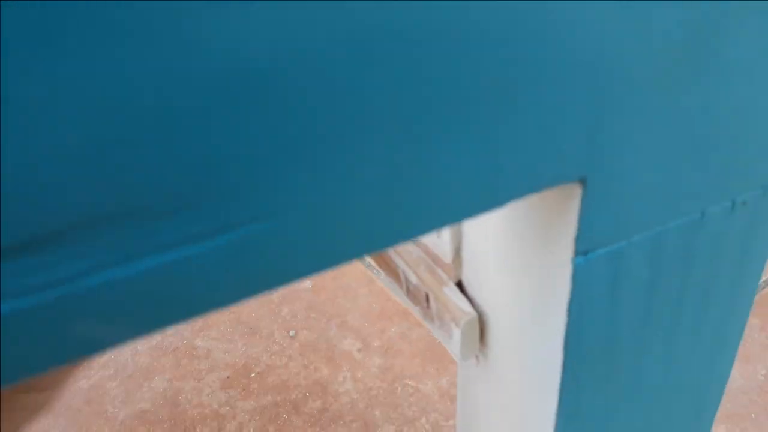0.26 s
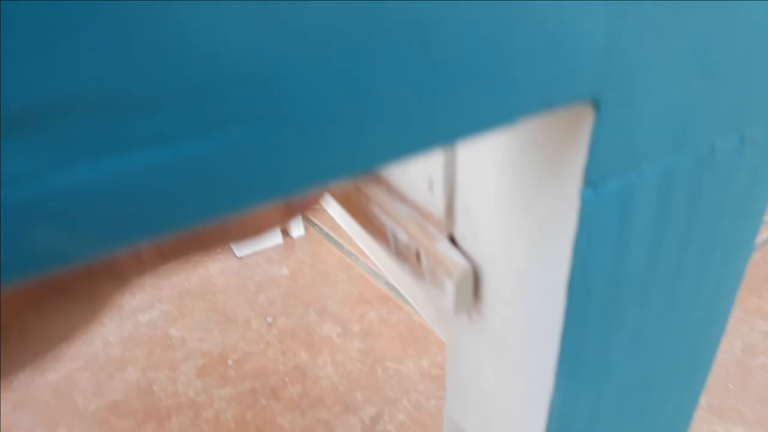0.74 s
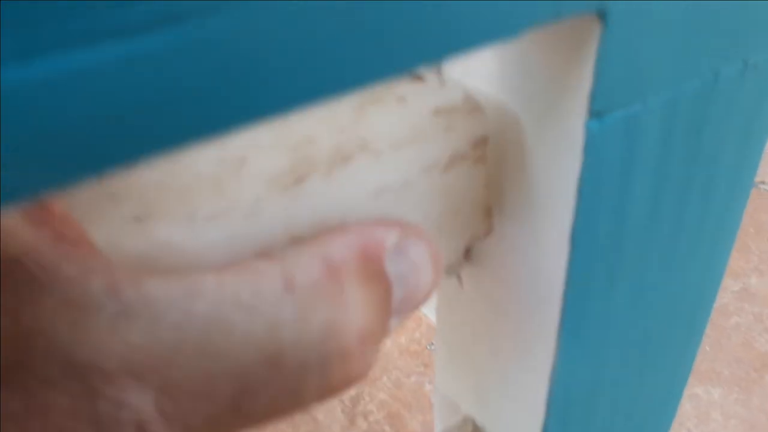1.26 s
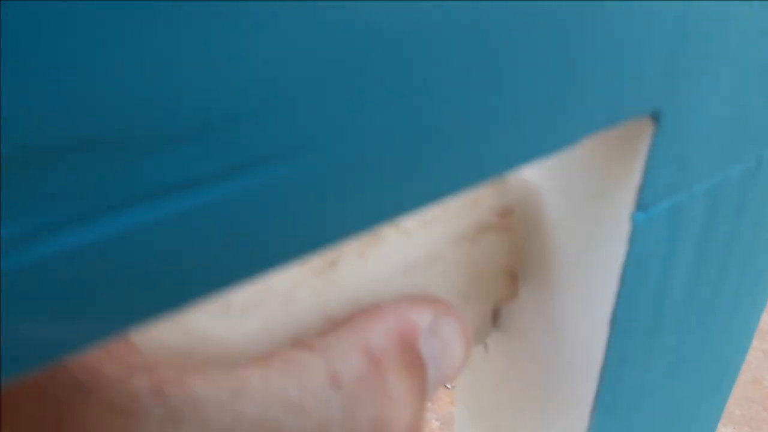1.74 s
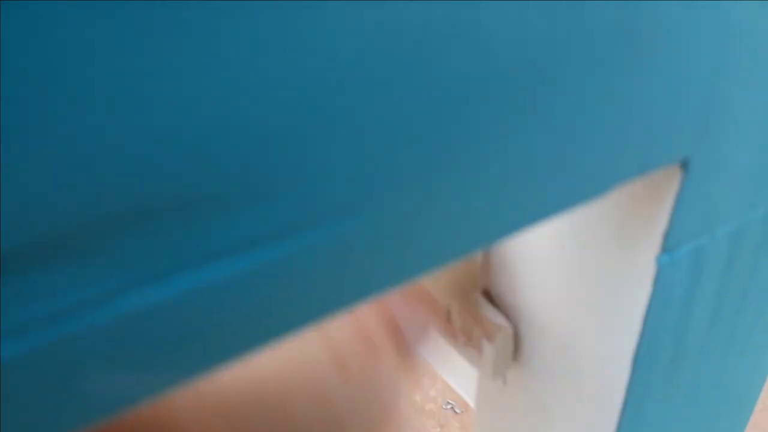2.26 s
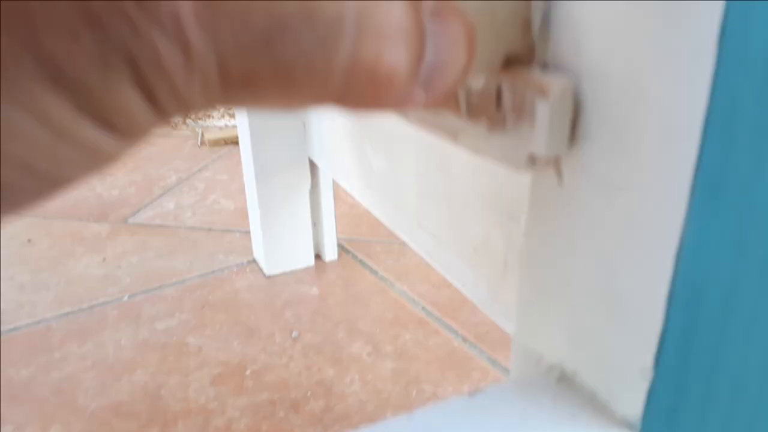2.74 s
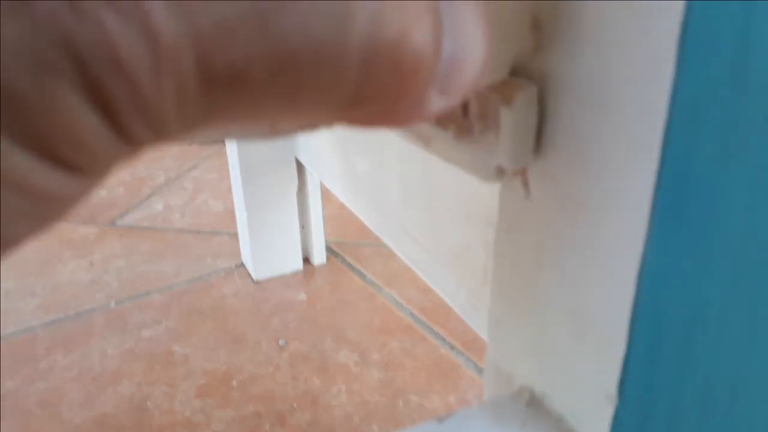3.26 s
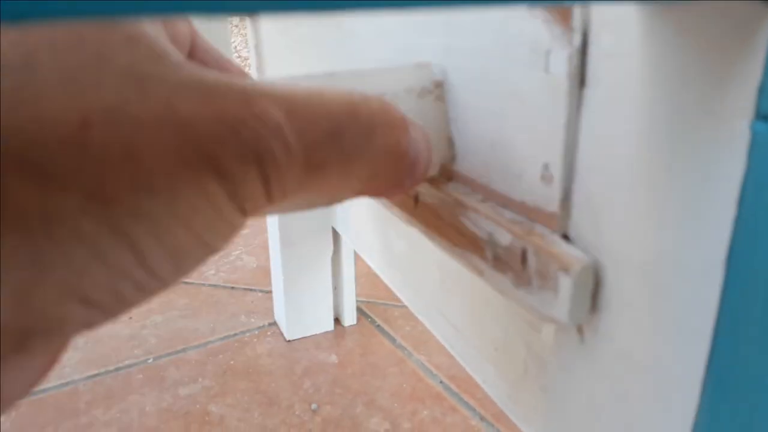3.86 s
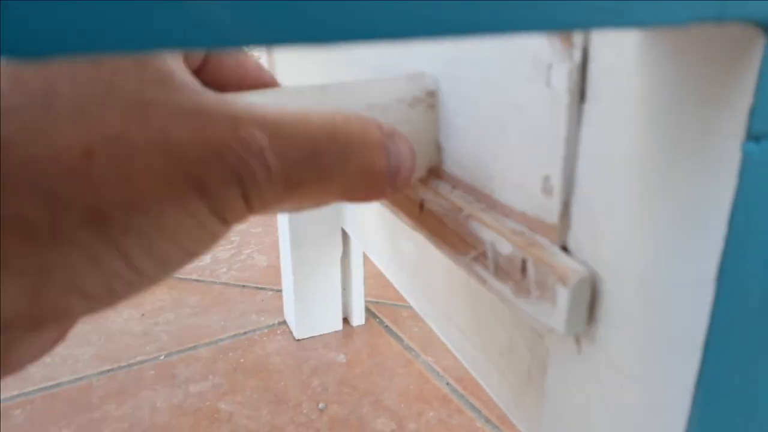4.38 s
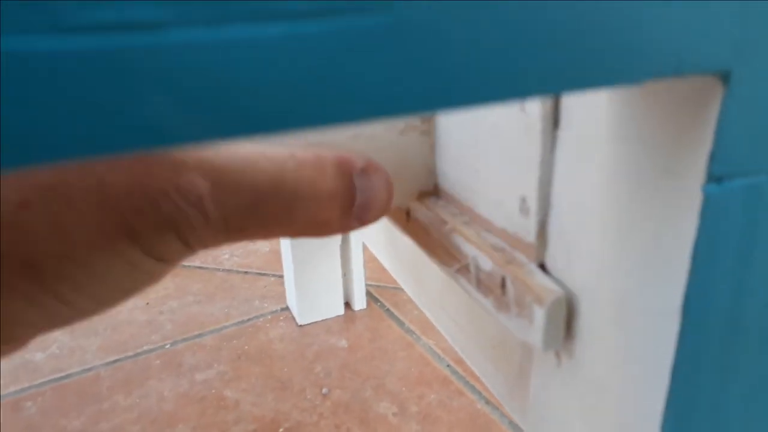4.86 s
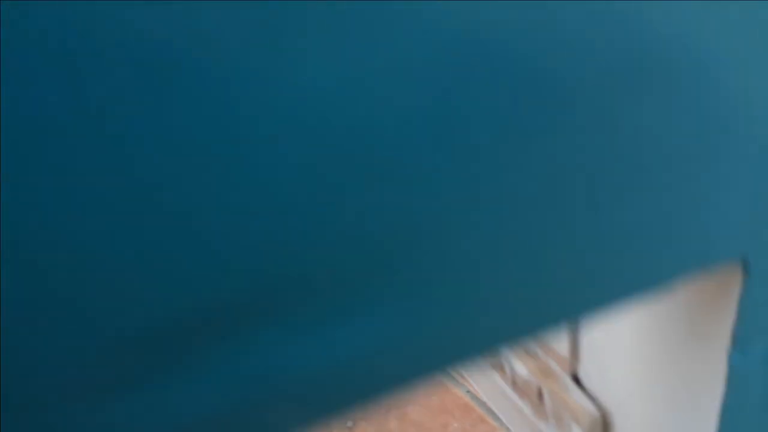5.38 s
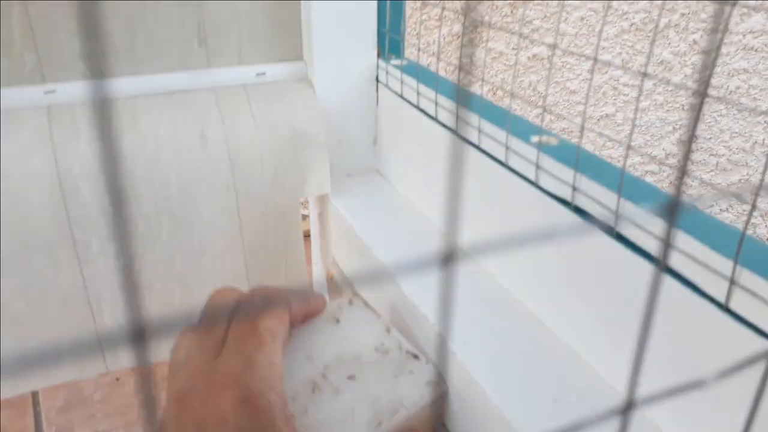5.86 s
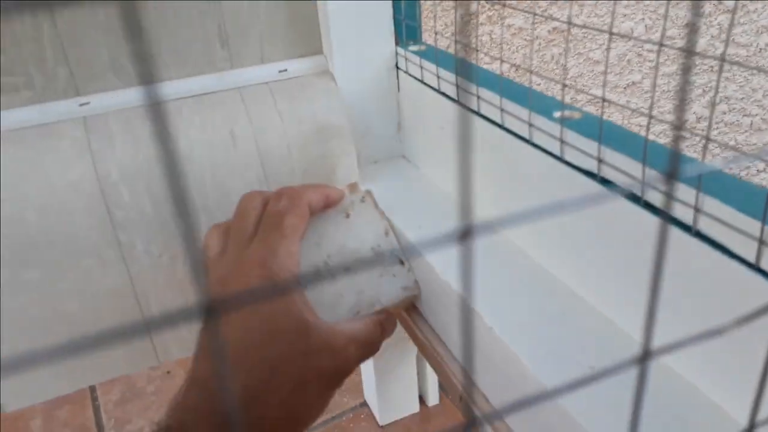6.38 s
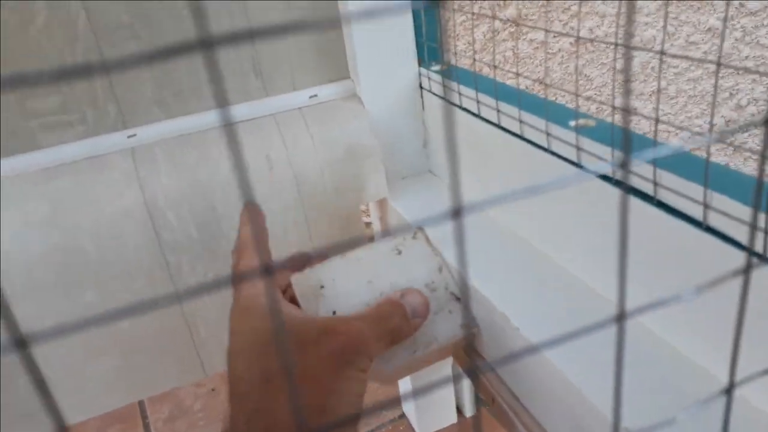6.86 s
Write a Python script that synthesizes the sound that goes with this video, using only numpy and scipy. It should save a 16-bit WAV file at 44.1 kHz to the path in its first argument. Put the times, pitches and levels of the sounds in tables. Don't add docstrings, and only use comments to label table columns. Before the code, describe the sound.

Close to a handheld microphone, a block bangs hard on a small wooden hutch, with a boomy thud and two further knocks. Soft, quick rubbing strokes follow, woody and grainy with faint squeaks. After a brief lull the rubbing resumes with small bumps, then a sharp late knock and heavier strokes. Air buffets the microphone as it moves outside, where the strokes turn duller and stop. A small latch clacks amid thin bird peeps.

```python
import sys
import numpy as np
from scipy import signal
from scipy.fft import rfft, irfft, next_fast_len
from scipy.io import wavfile
from scipy.ndimage import uniform_filter1d

SR = 44100
rng = np.random.default_rng(int(sys.argv[2]) if len(sys.argv) > 2 else 0)


def ratio_of_db(decibels):
    return 10 ** (np.asarray(decibels, float) / 20)


def unload_audio(sound):
    columns = np.transpose(np.atleast_2d(sound))
    steps = np.round(np.clip(columns, -1, 1) * 32767)
    wavfile.write(sys.argv[1], SR, steps.astype(np.int16))


N = 314080

REST_DB = -82
STRUCK_DB = -23
SWEEP_DROP_DB, SWEEP_ROUND = 17, 1.6


def evened(x):
    return x / np.sqrt(np.mean(x ** 2) + 1e-20)


def peaked(x):
    return x / abs(x).max()


def column(rows, k, at):
    table = np.array(rows)
    return np.interp(at, table[:, 0], table[:, k])


def add(mix, s, sound):
    part = mix[round(s * SR):][:len(sound)]
    part += sound[:len(part)]


def coloured(x, points):
    hz, db = np.transpose(points)
    size = next_fast_len(x.shape[-1])
    f = np.fft.rfftfreq(size, 1 / SR)
    gain = ratio_of_db(np.interp(np.log(f + 1), np.log(hz), db))
    return irfft(rfft(x, size) * gain, size)[..., :x.shape[-1]]


def above(x, hz):
    return signal.sosfilt(signal.butter(3, hz, "high", fs=SR, output="sos"), x)


def softened(x, hz):
    return signal.sosfilt(signal.butter(2, hz, fs=SR, output="sos"), x)


def ring(x, hz, t60):
    r = 1000 ** (-1 / (t60 * SR))
    w = 2 * np.pi * hz / SR
    return signal.lfilter([.5, 0, -.5], [1, -2 * r * np.cos(w), r * r], x)


def tail(t60, seconds):
    t = np.arange(round(seconds * SR)) / SR
    taps = rng.standard_normal((2, len(t))) * ratio_of_db(-60 * t / t60) * np.minimum(t / 0.0038, 1)
    return taps / np.linalg.norm(taps, axis=1, keepdims=True)


def wander(per_s):
    knots = rng.standard_normal(int(40 * N / SR))
    return np.interp(np.arange(N) * per_s / SR, np.arange(len(knots)), knots)


def swells(rows, drop_db, shape, floor_db):
    t = np.arange(0, N / SR + .004, .002)
    top, rise, fall, db = np.array(rows, float).T[:, :, None]
    before = (top - t) / np.maximum(rise, .005)
    after = (t - top) / np.maximum(fall, .005)
    away = np.where(t < top, before, after)
    power = (ratio_of_db(db - drop_db * away ** shape) ** 2).sum(0) + ratio_of_db(floor_db) ** 2
    return np.interp(np.arange(N) / SR, t, 10 * np.log10(power))


def slips(per_s, spread_db):
    size = ratio_of_db(spread_db * np.minimum(rng.exponential(1, N), 4)) * rng.choice([-1., 1.], N)
    return evened(size * (rng.random(N) < per_s / SR))


# (frequency [Hz], level [dB], t60 [s])
FRAME_MODES = [(292, -14, 0.07), (350, -3.5, 0.073), (387.6, -8, 0.051), (438.8, -1, 0.074),
               (481.3, 3, 0.073), (543.3, -6.5, 0.13), (596, -2.5, 0.056)]
UPPER_MODES = [(713, 1, 0.062), (739, 0, 0.11), (809, 4.5, 0.033), (920, 2.5, 0.036), (1063, -1, 0.11),
               (1126, -12, 0.1), (1257, 3.5, 0.06), (1530, -26, .04), (1790, -34, .03)]
# (time [s], peak [dB], struck part of the frame [Hz], upper modes re peak [dB])
KNOCKS = [(0.0615, 2, 475, -6), (0.3675, -10, 320, -13.5), (0.687, -1.5, 473, 9), (1.766, -37.5, 376, -17),
          (2.051, -30, 490, -1), (3.087, -17, 486, -6), (3.349, -21.5, 520, -13), (3.495, -27, 590, 8),
          (3.599, -31.5, 550, 18), (3.74, -25, 487, 4), (3.843, -29, 484, 1), (4.24, -24.5, 605, -3),
          (6.185, -33.5, 350, -14), (4.718, -17, 596, -5), (4.848, -3.5, 560, 1), (4.995, -21, 560, 1),
          (5.834, -41, 400, -20)]
JOLTS = [(0.0634, -6, 344.6, -24), (0.072, -5, 430, 2), (0.081, -9, 560, -13), (0.094, -15.5, 304, -6),
         (0.108, -18, 295, -10), (0.6845, -13.5, 498, -12), (0.706, -17, 480, 5), (0.728, -20.5, 427, -1),
         (3.118, -30, 480, 2), (3.385, -31.5, 497, -11), (3.507, -29, 605, 5), (3.52, -28, 390, -4),
         (3.86, -40, 450, -3), (4.252, -29.5, 543, -3), (5.85, -26, 397, -20), (3.754, -29, 474, -15),
         (3.948, -36, 480, -1), (3.967, -31, 483, 19), (3.992, -28, 520, 2), (4.27, -31, 590, -12),
         (4.333, -34, 440, -5), (4.4, -30.5, 466, -18), (4.845, -14, 600, 6), (4.854, -7, 535, -7),
         (4.858, -10, 560, -17), (4.87, -26, 350, -11), (4.878, -25, 590, -18), (4.888, -26, 584, -16),
         (5.02, -32, 543, -4), (5.147, -40, 480, -15), (5.189, -24.5, 478, -13), (5.346, -35, 483, -6),
         (5.536, -24.5, 460, -22), (5.688, -33, 476, -4), (5.83, -35, 450, -4), (5.987, -29.5, 460, -9),
         (6.023, -49, 450, 2), (6.06, -29.5, 440.6, -5), (6.173, -38, 350, -22), (6.215, -30.5, 380, -21),
         (6.235, -38, 435, -19)]


def knocks():
    out, t = np.zeros(N), np.arange(8000) / SR
    for s, peak_db, struck_hz, upper_db in KNOCKS + JOLTS:
        blow_ms = 4.8 if peak_db > STRUCK_DB else 7.9
        noise = np.pad(rng.standard_normal(2000), (0, len(t) - 2000))
        rough = noise * t * np.exp(-2000 * t / blow_ms)
        snap = np.exp(-((t - .0025) / .0004) ** 2)
        top_hz = np.clip(2300 * ratio_of_db(0.25 * peak_db), 400, 9000)
        push = softened(peaked(rough) + 0.33 * snap, top_hz)
        near = np.zeros(len(t))
        for hz, db, t60 in FRAME_MODES:
            loaded_hz = hz * (struck_hz / 480) ** .12
            focus_db = 45 * np.log2(hz / struck_hz) ** 2
            near += peaked(ring(push, loaded_hz, t60)) * ratio_of_db(db - focus_db)
        high = sum(ring(push, hz, 0.5 * t60) * ratio_of_db(0.76 * db) for hz, db, t60 in UPPER_MODES)
        one_rail = ratio_of_db(-22 - 60 * abs(np.log2(struck_hz / 555))) * peaked(ring(push, 550, .6))
        blow = peaked(peaked(near) + ratio_of_db(upper_db) * peaked(high) + one_rail)
        add(out, s - .001, ratio_of_db(peak_db - 2.5) * blow)
    room = signal.fftconvolve(out, tail(0.12, seconds=.4)[0])[:N]
    return softened(softened(above(out + ratio_of_db(-11) * room, 220), 1500), 1900)


# (time [s], time to ease by 20 dB [s], frame ring [dB], panel boom [dB])
BITES_KNOCKING = [
    (0, 0.3, -31.5, -45),
    (0.07, 0.2061, -36, -32.5),
    (0.377, 0.2, -37.5, -40.5),
    (.507, 0.15, -64, -45),
    (.585, -1.4, -62, -41.5),
    (0.699, 0.2044, -31, -43.5),
    (.8, 1, -55.5, -70),
]
BITES_FIRST = [(0.923, 0.16, -43, -44), (1.08, 0.19, -46, -53.5), (1.228, 0.15, -38.5, -42.5),
               (1.372, 0.14, -42.5, -50), (1.509, 0.12, -44.5, -46.5), (1.642, 0.088, -44, -44.5),
               (1.776, 0.13, -44, -39), (1.895, 0.13, -42.5, -47), (2.06, 0.085, -44, -39),
               (2.17, 0.22, -49, -52.5), (2.31, 0.11, -48.5, -43), (2.444, 0.13, -55.5, -58),
               (2.971, 0.18, -67, -56.5)]
BITES_SECOND = [(3.097, 0.084, -35, -44.5), (3.222, 0.12, -45, -41.5), (3.363, 0.12, -40.5, -47),
                (3.517, 0.11, -42.5, -44), (3.615, 0.086, -38, -46), (3.755, 0.065, -35, -38),
                (3.855, 0.097, -40, -39), (3.983, 0.1, -35.5, -36.5), (4.123, 0.13, -45.5, -46.5),
                (4.243, 0.084, -44.5, -41.5), (4.407, 0.12, -46.5, -48), (4.502, 0.18, -58.5, -66)]
BITES_LAST = [(4.717, 0.2, -41.5, -42), (4.856, 0.16, -31.5, -39.5), (4.995, 0.094, -29.5, -46),
              (5.17, 0.16, -36.5, -40), (5.348, 0.11, -39, -41), (5.519, 0.079, -36.5, -35.5),
              (5.689, 0.092, -35.5, -42), (5.851, 0.1, -36, -34.5), (6.009, 0.14, -39, -39),
              (6.197, 0.12, -39.5, -44.5), (6.356, 0.2, -48, -48.5), (6.696, 0.063, -43.5, -39),
              (6.769, 0.094, -45, -53), (6.887, 0.23, -49, -57), (7.05, 0.5, -59, -77)]


def bites(panels):
    rows = BITES_KNOCKING + BITES_FIRST + BITES_SECOND + BITES_LAST
    s, ease, frame_db, boom_db = np.array(rows, float).T
    hard_s = np.array([knock[0] for knock in KNOCKS if knock[1] > STRUCK_DB])
    struck = abs(s[:, None] - hard_s).min(1) < .025
    rise = np.where(struck, 0.027, 0.052)
    if panels:
        rows = [s + 0.0097, 1.51 * rise, 1.51 * ease, boom_db]
    else:
        rows = [s, rise, ease, frame_db]
    return swells(np.transpose(rows), 22.6, 1.085, REST_DB)


def body(force, modes, level_db, place_db, steady_s):
    sound = sum(ring(force * ratio_of_db(db + place_db * wander(per_s=11)), hz, t60) for hz, db, t60 in modes)
    drag = abs(uniform_filter1d(sound ** 2, round(steady_s * SR))) + 1e-20
    return ratio_of_db(level_db) * evened(sound / drag ** 0.44)


def rub():
    sliding_db = np.minimum(bites(panels=False), -25)
    force = slips(per_s=1500, spread_db=2.5)
    upper_db = -52 + 0.8 * (sliding_db + 46)
    frame = softened(body(force, FRAME_MODES, sliding_db, place_db=5.5, steady_s=0.072), 1600)
    upper = softened(body(force, UPPER_MODES, upper_db, place_db=6.5, steady_s=0.03), 1100)
    near = softened(above(frame, 260) + above(upper, 520), 1600)
    outside = softened(softened(near, 1050), 1050) * ratio_of_db(2)
    return np.where(np.arange(N) < 5.78 * SR, near, outside)


# (frequency [Hz], level [dB], t60 [s])
PANEL_MODES = [(109, -8.5, 0.52), (149.7, 5.5, 0.19), (203, -6.5, 0.57)]


def boom():
    force = slips(per_s=1500, spread_db=2.5)
    shudder = body(force, PANEL_MODES, bites(panels=True), place_db=2.5, steady_s=.05)
    return above(softened(shudder, 290), 70) * ratio_of_db([[1.5], [-1.5]])


def thud():
    s, db, hz, t60 = 0.05, -20.5, 151.5, 0.4
    out, t = np.zeros(N), np.arange(SR // 2) / SR
    add(out, s, ratio_of_db(db - 60 * t / t60) * np.sin(2 * np.pi * hz * t) * np.minimum(t / 0.033, 1))
    return out


# (top [s], swell [s], fade [s], level [dB])
RAIL_HUMS = [
    (.084, .014, .014, -21),
    (.185, .03, .1, -36),
    (.3, .1, .06, -38),
    (3.36, .01, .03, -37),
    (4.857, .012, .014, -20),
    (4.885, .02, .03, -33),
    (5.08, .05, .06, -48),
]


def rail():
    hum = ring(slips(per_s=400, spread_db=-1.5), hz=545, t60=.2)
    hum = hum / (abs(uniform_filter1d(hum ** 2, size=3000)) + 1e-20) ** .4
    return evened(hum) * ratio_of_db(swells(RAIL_HUMS, SWEEP_DROP_DB, SWEEP_ROUND, -200))


# (frequency [Hz], density [dB per Hz])
FIZZ_COLOUR = [(900, 7), (1800, 7), (3300, 4.5), (6500, 5.5), (7600, 4.5), (8300, -6.5), (10500, -1.5),
               (15500, -6.5)]
# (time [s], peak [dB], pitch [Hz])
TICKS = [(0.0615, 0.5, 5840), (0.066, -9, 2100), (0.07, -19, 3160), (3.155, -41.5, 2500),
         (3.261, -46, 2000), (3.395, -39, 1900), (4.361, -39, 2300), (0.366, -29, 1510),
         (0.6855, -22, 3300), (0.842, -33, 3670), (1.7614, -35, 4860), (2.05, -34, 2010),
         (3.229, -38.5, 1700), (3.737, -34, 1300), (4.3355, -25.5, 4200), (4.4288, -39, 2240),
         (4.846, -29.5, 2940), (5.201, -28, 3900), (6.517, -39.5, 6950), (6.727, -37, 3700)]


def ticks():
    out, t = np.zeros(N), np.arange(3000) / SR
    for s, peak_db, hz in TICKS:
        burst = rng.standard_normal(len(t)) + 9 * (t == t[2])
        crack = coloured(burst, FIZZ_COLOUR) * ratio_of_db(-60 * t / .008)
        crack = evened(crack) + .4 * evened(ring(crack, hz, .004))
        add(out, s, ratio_of_db(peak_db) * peaked(crack))
    return softened(out, 9000)


# (frequency [Hz], left minus right [dB],
# left lead [rad], share of sound scattered inside the hutch [0-1])
PORTS = [(100, -4, -1, 0), (252, 4, 0.88, 0.23), (1000, 2.5, 0.81, 0.35), (1820, -4, 2.5, 0.72),
         (4600, -5.5, 3, 1), (6560, -1.5, 0, 1), (8900, 7, 9, 0.87), (11820, 5.5, 5, 0.4)]


def ports(x, own=None):
    hz, frames, z = signal.stft(x, SR, nperseg=1024, noverlap=768)
    balance_db, lead, scatter = (column(PORTS, k, hz)[:, None] for k in range(1, 4))
    taps = uniform_filter1d(rng.standard_normal((2, 512, len(frames))), size=8, axis=2)
    taps = taps * ratio_of_db(-60 * np.arange(512) / SR / 0.025)[:, None]
    walls = z * rfft(taps, 1024, axis=1) / np.sqrt((taps ** 2).sum(1).mean())
    if own is not None:
        walls = 0.76 * walls + 0.76 * signal.stft(own, SR, nperseg=1024, noverlap=768)[2]
    side, scatter = np.array([.5, -.5])[:, None, None], np.clip(scatter, 0, 1)
    heard = np.sqrt(1 - scatter) * np.exp(1j * side * lead) * z + np.sqrt(scatter) * walls
    return signal.istft(heard * ratio_of_db(side * balance_db), SR, nperseg=1024, noverlap=768)[1][:, :N]


# (fastest [s], speeding up [s], slowing down [s], fizz [dB])
SWEEPS_EARLY = [(0.02, 0.23, 0.066, -49.5), (0.1, 0.083, 0.03, -51.5), (0.19, 0.21, 0.084, -54),
                (0.37, 0.19, 0.046, -67.5), (0.537, 0.14, 0.13, -52.5), (0.68, 0.027, 0.15, -63.5),
                (0.933, 0.063, 0.12, -57.5), (1.085, 0.074, 0.31, -62.5), (1.245, 0.17, 0.044, -61),
                (1.364, 0.12, 0.097, -64.5), (1.515, 0.06, 0.043, -62), (1.639, 0.075, 0.057, -65.5),
                (1.776, 0.033, 0.057, -60.5), (1.91, 0.19, 0.07, -66.5), (2.142, 0.24, 0.21, -67.5),
                (2.33, 0.056, 0.034, -63), (2.45, 0.27, 0.12, -64.5), (2.61, 0.061, 0.076, -70)]
SWEEPS_LATE = [(3.093, 0.04, 0.055, -64.5), (3.232, 0.12, 0.056, -66.5), (3.435, 0.18, 0.15, -68),
               (3.507, 0.025, 0.042, -73), (3.606, 0.037, 0.062, -71), (3.839, 0.15, 0.093, -64),
               (4.044, 0.14, 0.14, -61.5), (4.309, 0.1, 0.29, -61), (4.562, 0.1, 0.053, -70),
               (4.685, 0.046, 0.03, -64), (4.78, 0.15, 0.09, -63), (4.849, 0.02, 0.03, -59),
               (5.019, 0.093, 0.098, -62.5), (5.174, 0.12, 0.085, -67), (5.379, 0.18, 0.046, -68.5),
               (5.592, 0.15, 0.31, -65.5), (5.844, 0.042, 0.35, -67.5), (6.06, 0.063, 0.11, -61.5),
               (6.213, 0.23, 0.079, -65.5), (6.375, 0.09, 0.2, -67), (6.51, 0.262, 0.25, -82),
               (6.893, 0.26, 0.09, -65.5), (7.138, 0.099, 0.33, -60.5)]
# (top [s], swell [s], fade [s], level
# [dB], frequency [Hz])
SQUEALS = [(.55, .1, .07, -65, 1850), (1.15, 0.3, 0.1, -53, 1680), (1.17, 0.18, 0.08, -60, 2170),
           (1.18, 0.2, 0.07, -58, 4350), (1.16, .25, .12, -62, 2950), (1.42, 0.13, 0.09, -62.5, 1790),
           (3.99, .035, .035, -56, 1850), (5.32, .045, .05, -63, 2450), (3.44, .06, 0.05, -68, 2320),
           (3.43, 0.075, 0.085, -63.5, 3900), (3.22, .04, .05, -62, 4700), (4.9, .04, .2, -58, 1550),
           (6.915, .025, .7, -54, 1500), (6.93, .04, .7, -55, 1760), (.93, .04, .06, -59, 4400),
           (1.35, .04, .05, -63, 4900), (5.61, .04, .05, -63, 2150), (6.82, .05, .04, -69, 2300)]
WHINES = [(2.15, 0.12, 0.29, -71, 2130), (2.36, 0.25, 0.25, -70, 2205), (2.57, 0.3, 0.11, -66, 2210),
          (1.19, .17, .03, -59, 2230), (5.85, 0.043, 0.047, -43, 830), (6.03, 0.064, 0.077, -50, 895),
          (1.16, .05, .05, -58, 1790), (6.92, .025, .7, -56, 1600), (6.91, .02, .7, -57, 1430),
          (7.05, .15, .3, -62, 3900), (6.999, 0.13, .3, -70, 2140)]


def fizz():
    jerks = np.array([slips(per_s=11000, spread_db=3.5) for way in range(3)])
    level_db = swells(SWEEPS_EARLY + SWEEPS_LATE, SWEEP_DROP_DB, SWEEP_ROUND, REST_DB)
    level_db = level_db + 3 + 2.4 * wander(per_s=40)
    grain = coloured(jerks, FIZZ_COLOUR) * ratio_of_db(level_db) / np.sqrt(.27)
    grain = grain + ratio_of_db(-36.5) * ring(grain, hz=4660, t60=0.0029)
    waver_db = 3 * wander(per_s=25)
    voices = [(row, .0055 * min(2200 / row[4], 1) ** 2) for row in SQUEALS]
    voices += [(row, .013) for row in WHINES]
    for (*swell, hz), t60 in voices:
        span = slice(round((swell[0] - .4) * SR), round((swell[0] + .4) * SR))
        song = evened(ring(ring(jerks[:, span], hz, t60), hz, t60))
        song_db = np.roll(waver_db, round(9 * hz)) + swells([swell], SWEEP_DROP_DB, SWEEP_ROUND, -200)
        grain[:, span] += song * ratio_of_db(song_db[span])
    return ports(grain[0], grain[1:])


# (frequency [Hz], level [dB], t60 [s])
LATCH_LOW = [(460, 6, 0.0098), (1450, 10.5, 0.01), (1570, -7, 0.023), (1690, -22, 0.0081)]
LATCH_BRIGHT = [(3600, -13, 0.013), (6270, 5, .008), (6700, 5, 0.0077)]
# (time [s], peak [dB], bright ring re peak [dB])
LATCH_CLACKS = [
    (6.8805, -29.5, -15.5),
    (6.8908, -31.5, -18),
    (6.897, -25.5, -11),
    (6.9477, -35.5, -16),
]


def latch():
    low, bright, click = np.zeros(N), np.zeros(N), np.eye(1, 2000)[0]
    low_ring = sum(ratio_of_db(db) * ring(click, hz, t60) for hz, db, t60 in LATCH_LOW)
    bright_ring = sum(ratio_of_db(db) * ring(click, hz, t60) for hz, db, t60 in LATCH_BRIGHT)
    for s, peak_db, bright_db in LATCH_CLACKS:
        add(low, s, ratio_of_db(peak_db - 4.5) * low_ring)
        add(bright, s, ratio_of_db(peak_db + bright_db + 12) * bright_ring)
    low_tail, bright_tail = tail(1.3, seconds=.4)[0], tail(.4, seconds=.4)[0]
    yard = ratio_of_db(-13) * signal.fftconvolve(above(low, 1300), low_tail)
    yard = yard + ratio_of_db(-6) * signal.fftconvolve(bright, bright_tail)
    return softened(low + bright + yard[:N], 4600)


# (time [s], length [s], frequency [Hz], level [dB])
PEEPS = [
    (2.05, .04, 4850, -64),
    (2.3, .04, 4850, -63),
    (2.607, 0.055, 4900, -58),
    (3.93, .06, 4930, -59),
    (6.655, .04, 4900, -61),
]
# (time [s], frequency [Hz], level [dB])
TWITTER = [
    [(4.345, 5000, -66), (4.38, 4100, -61), (4.42, 3300, -65)],
    [(6.86, 5800, -62), (6.885, 6000, -59), (6.9, 6300, -63)],
    [(7.03, 5800, -70), (7.06, 6150, -59), (7.12, 6200, -59)],
]
ARCH = [(2.85, 6350, -69), (2.885, 6800, -69), (2.925, 6150, -76), (2.97, 6480, -70), (3.0, 5900, -69),
        (3.025, 5800, -67)]
FALL = [(6.42, 7600, -72), (6.46, 7880, -67), (6.5, 7350, -69), (6.53, 7150, -73), (6.58, 7000, -75),
        (6.61, 7300, -73), (6.65, 6700, -74)]
SWOOP = [(6.73, 6650, -65), (6.76, 7000, -64), (6.8, 7900, -65), (6.85, 8350, -66), (6.88, 8650, -66),
         (6.91, 7900, -66), (6.94, 7200, -68), (6.98, 6700, -74)]


def birds():
    out = np.zeros(N)
    notes = TWITTER + [ARCH, FALL, SWOOP]
    for s, length, hz, db in PEEPS:
        notes = notes + [[(s, 1.03 * hz, db - 7), (s + length / 2, hz, db), (s + length, hz, db - 7)]]
    for rows in notes:
        t = np.arange(rows[0][0], rows[-1][0], 1 / SR)
        tremble = 0.1 * uniform_filter1d(rng.standard_normal(len(t)), size=90)
        hz = column(rows, 1, t) * (1 + tremble)
        note = np.sqrt(2) * np.sin(2 * np.pi * np.cumsum(hz) / SR) * signal.windows.tukey(len(t), .15)
        flutter_db = -2.5 + 36 * uniform_filter1d(rng.standard_normal(len(t)), size=120)
        add(out, t[0], ratio_of_db(column(rows, 2, t) + flutter_db) * note)
    echo = signal.fftconvolve(out[None], tail(0.16, seconds=0.58), axes=1)[:, :N]
    return out * ratio_of_db([[-3], [2]]) + ratio_of_db(-7) * echo


# (top [s], swell [s], fade [s], level [dB])
BUFFETS = [
    (.26, 0.12, 0.07, -34),
    (.57, 0.067, 0.29, -51.5),
    (3.19, .2, 0.34, -79),
    (3.77, 0.14, .4, -59),
    (5.61, 0.068, 0.038, -38.5),
    (5.71, 0.075, 0.048, -39.5),
    (5.97, 0.1, 0.066, -49),
]
GUST = [
    (5.635, 0.045, 0.06, -25),
]


def buffet():
    deep_colour = [(15, -24.5), (35, 2), (60, -28.5), (90, -4), (200, -49)]
    gust_colour = [(25, -40.5), (60, -5), (170, 0), (300, -9), (700, -57)]
    deep = evened(coloured(rng.standard_normal((2, N)), deep_colour))
    gust = evened(coloured(rng.standard_normal(N), gust_colour))
    gust = gust * ratio_of_db(swells(GUST, 22, 0.94, REST_DB))
    still_db = -74
    deep = deep * ratio_of_db(swells(BUFFETS, 15, 0.87, still_db) + np.array([[4], [-6]]))
    return above(deep + gust * ratio_of_db([[3], [-14]]), 38)


# (frequency [Hz], density [dB per Hz])
AIR_COLOUR = [(69, -23.5), (106, -13.5), (174, 3.5), (300, -9.5), (509, 0.5), (900, -35), (4240, -7),
              (11000, -41.5)]
YARD_COLOUR = [(700, -3), (1400, -3), (2200, -4.5), (3800, 1.5), (5200, -6.5), (7200, -6.5), (8300, -28)]
# (time [s], level [dB])
YARD_LEVEL = [
    (0, -71),
    (2.5, -91),
    (4.5, -80),
    (6.3, -84),
    (6.45, -59.5),
    (6.8, -54.5),
    (7.12, -55),
]
# (frequency [Hz], level [dB], t60 [s])
HUM_MODES = [(108.3, -60, 0.59), (156, -69, 0.076)]


def air():
    noise = rng.standard_normal((3, N))
    hiss = ratio_of_db(-66) * evened(coloured(noise, AIR_COLOUR))
    wash_db = column(YARD_LEVEL, 1, np.arange(N) / SR)
    wash = ratio_of_db(wash_db) * evened(coloured(noise[:, ::-1], YARD_COLOUR))
    hum = sum(ratio_of_db(db) * evened(ring(noise[0], hz, t60)) for hz, db, t60 in HUM_MODES)
    both = (hiss + wash) * ratio_of_db(0.58 * wander(per_s=21))
    return ports(both[0], both[1:]) + hum


# (time [s], left minus right [dB])
TURN = [
    (0, -0.5),
    (.5, -5.5),
    (1, -2.5),
    (4, -1),
    (7.12, -2),
]


def scene():
    tick = ticks()
    lag = 5
    straight = ratio_of_db(1) * np.array([np.roll(tick, lag), tick]) * ratio_of_db([[-3], [2]])
    wood = rub() + rail() + knocks() + ratio_of_db(1.5) * tick + latch()
    turn = ratio_of_db(np.array([[.5], [-.5]]) * column(TURN, 1, np.arange(N) / SR))
    return ports(wood) * turn + straight + thud() + boom() + fizz() + birds() + air() + buffet()


def top_cut(x):
    return signal.sosfilt(signal.butter(12, 16970, fs=SR, output="sos"), x)


def record(dry):
    held = .95 * np.tanh(above(dry, 42) / .95)
    band_limit = signal.firwin(511, 15750, window=("kaiser", 6), fs=SR)
    limited = signal.oaconvolve(held, band_limit[None], "same")
    return top_cut(limited)


dry = scene()
out = record(dry)
unload_audio(out)
```